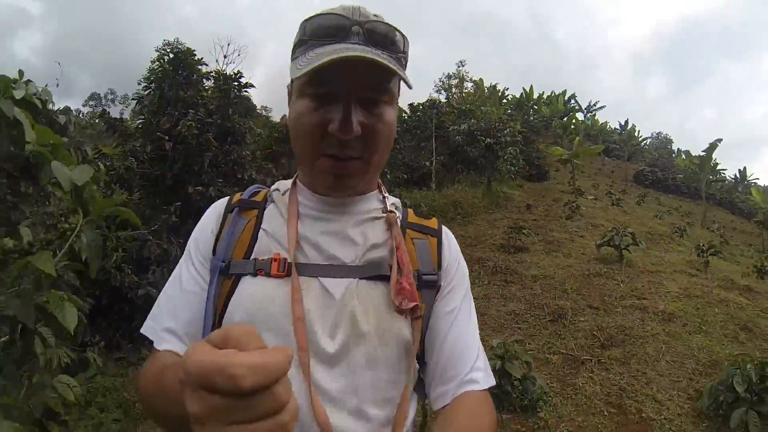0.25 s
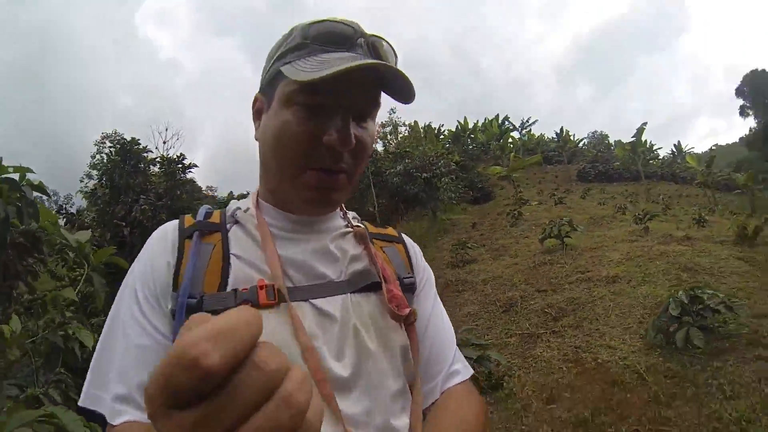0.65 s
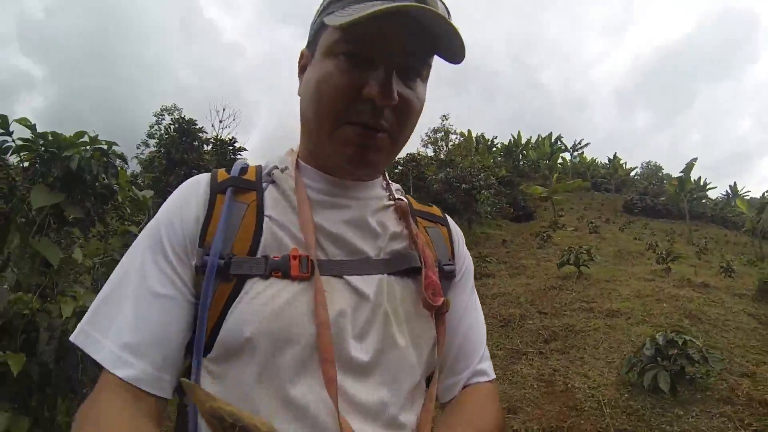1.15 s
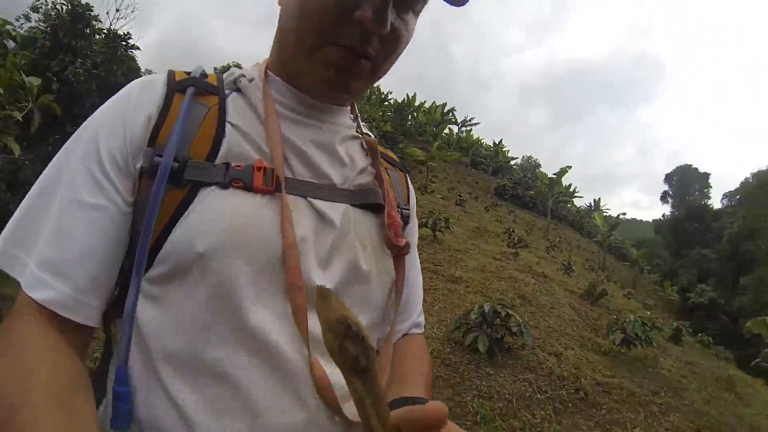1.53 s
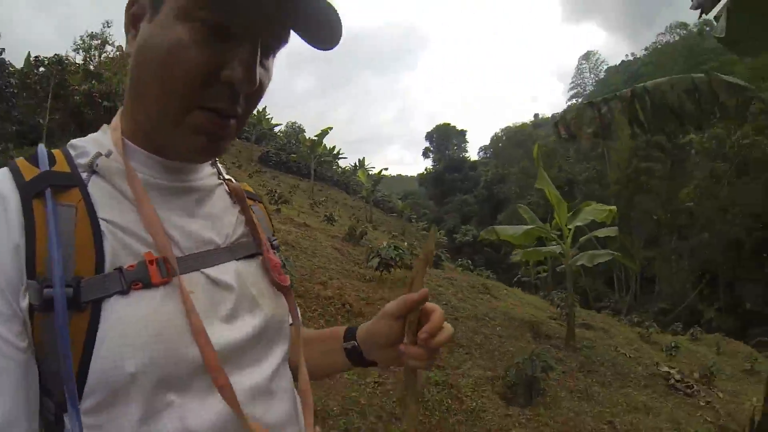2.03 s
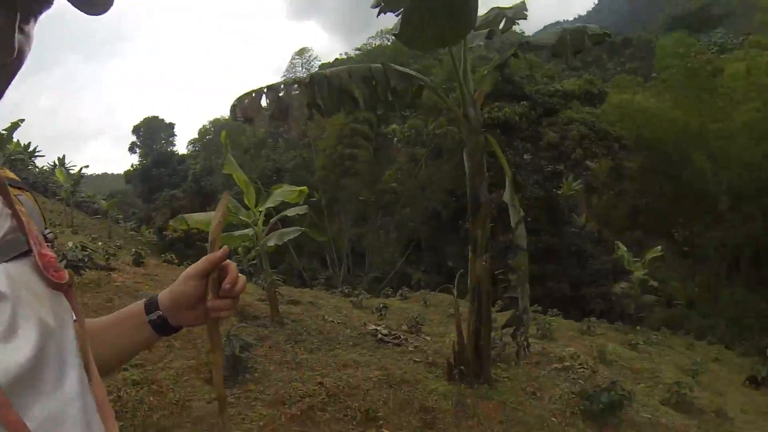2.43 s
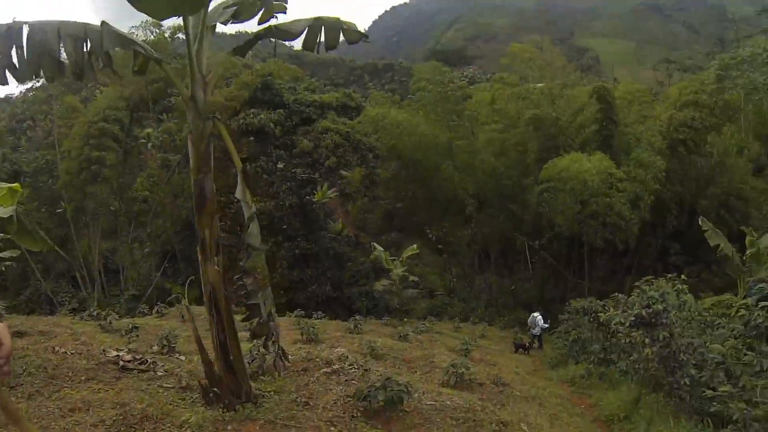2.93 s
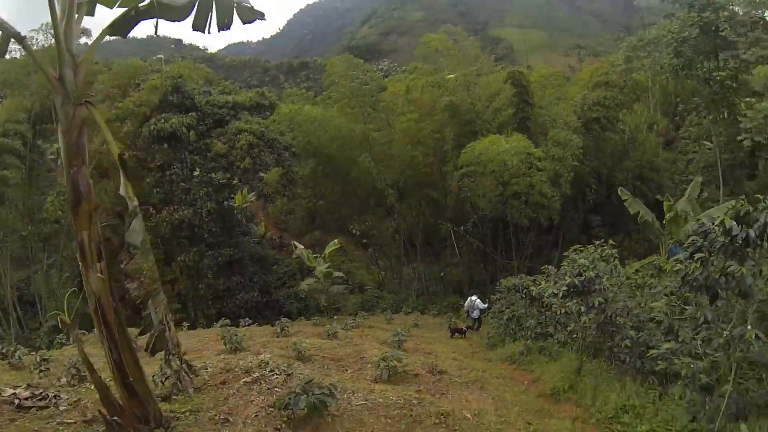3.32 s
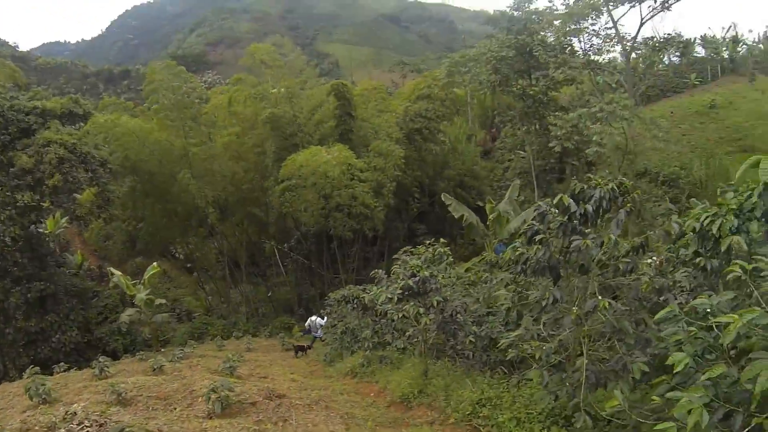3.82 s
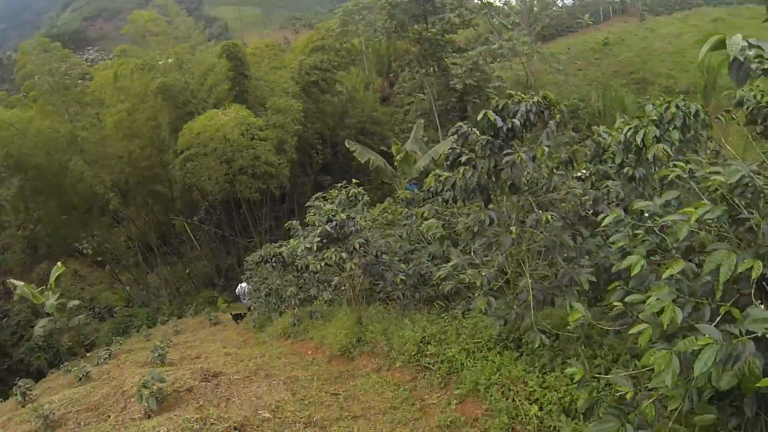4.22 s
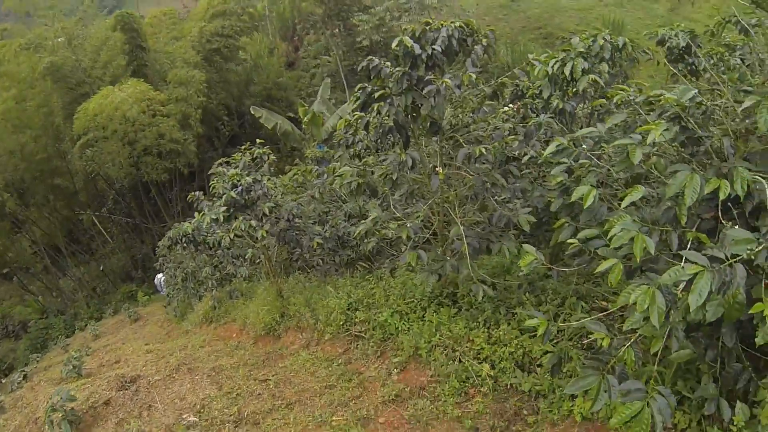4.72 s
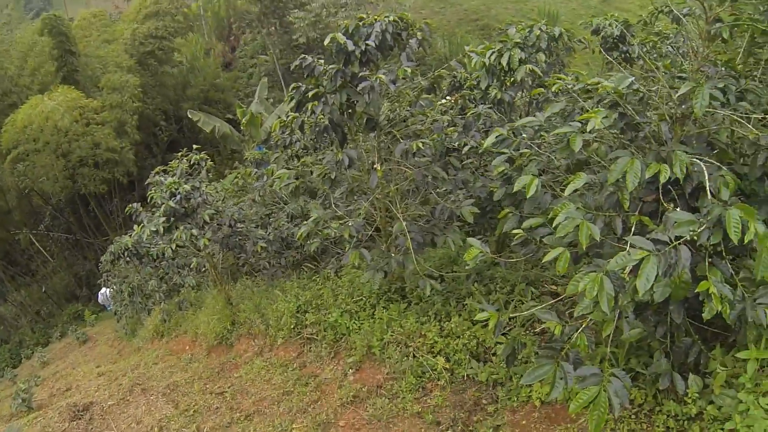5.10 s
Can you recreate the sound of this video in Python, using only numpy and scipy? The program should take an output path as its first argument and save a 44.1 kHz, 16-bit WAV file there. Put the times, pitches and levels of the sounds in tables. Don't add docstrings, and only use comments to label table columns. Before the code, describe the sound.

Close, boxy handling noise: fingers rub a hollow plastic case, sharp knocks and dull thumps cluster early, then fade to near silence outdoors.

```python
import sys
import numpy as np
from scipy import signal
from scipy.fft import rfft, irfft
from scipy.io import wavfile
from scipy.ndimage import uniform_filter1d

SR = 44100
rng = np.random.default_rng(int(sys.argv[2]) if len(sys.argv) > 2 else 0)


def output_pcm(signal):
    pcm = np.clip(np.atleast_2d(signal).T, -1, 1) * 32767
    wavfile.write(sys.argv[1], SR, np.round(pcm).astype(np.int16))


def gain_from_db(level_db):
    decades = np.asarray(level_db, float) / 20
    return 10 ** decades


N = 236155
T = np.arange(N) / SR

# start_s, length_s, force_db, speed_db
GRIP_SLIDES = [(0.045, 0.03, -58.5, -3), (0.526, 0.11, -60.5, -12), (0.648, 0.15, -55, 1),
               (0.767, 0.035, -51.5, 3), (0.848, 0.057, -44, 0.5), (1.088, 0.022, -48.5, 4),
               (1.127, 0.046, -46, 5), (1.366, 0.003, -30, 6.5), (1.353, 0.015, -31, 1),
               (2.075, 0.02, -59, 5), (2.103, 0.032, -49.5, 4), (2.196, 0.036, -52, -4),
               (2.362, 0.013, -49, 7), (2.457, 0.061, -51, -1), (2.496, 0.039, -39, -2),
               (2.569, 0.04, -41.5, -6), (2.594, 0.056, -36, -6), (2.715, 0.05, -40.5, -12),
               (2.702, 0.023, -48.5, -8), (2.815, 0.11, -51, -9), (3.255, 0.04, -51.5, 0),
               (3.487, 0.1, -53, -11), (3.569, 0.074, -49.5, -1.5), (3.825, 0.017, -61, 9),
               (3.91, 0.034, -34, 0.5), (4.33, 0.13, -64.5, 4), (4.535, 0.068, -66, 10)]
# start_s, length_s, force_db, speed_db
FRONT_SLIDES = [(0.504, 0.031, -56.5, -3), (0.9, 0.051, -61, 4), (0.955, 0.008, -55, 1),
                (1.182, 0.014, -50, 11.5), (1.232, 0.1, -57, -1), (1.373, 0.067, -41.5, 3.5),
                (1.3851, 0.018, -63, 2), (1.444, 0.062, -39, 8), (1.493, 0.034, -45, -6),
                (1.51, 0.12, -42.5, -5), (1.575, 0.061, -39.5, -5.5), (1.598, 0.083, -47.5, -3),
                (1.66, 0.083, -49.5, -1.5), (1.79, 0.023, -64.5, 7), (2.0301, 0.0071, -59, 9),
                (2.216, 0.051, -39, -2), (2.285, 0.075, -73, 13), (2.431, 0.031, -59.5, -2),
                (2.642, 0.03, -56.5, -14), (3.027, 0.26, -62, -18)]
# start_s, length_s, force_db, speed_db
MOUNT_SLIDES = [(0, 0.022, -56.5, 9.5), (0.1751, 0.018, -59.5, -27), (0.301, 0.07, -73.5, 17),
                (.951, 0.036, -69, -6), (1.184, 0.011, -56, -11), (1.3221, 0.035, -50, 11.5),
                (1.4341, 0.0223, -34.5, 1), (1.501, 0.31, -66.5, 2), (1.7411, 0.0069, -58, -1),
                (1.7661, 0.015, -68, 13), (2.0291, 0.082, -55, -8), (2.841, 0.049, -73, -8),
                (3.5, 0.048, -74, -3), (3.58, 0.065, -75, -10), (3.9421, 0.026, -63, -5)]
# start_s, length_s, force_db, speed_db
BACK_SLIDES = [
    (3.17, 0.051, -40.5, -3),
    (3.192, 0.051, -35, -1),
]
# window_db, mount_db, grit_db
AT_GRIP = (-9.5, -2.5, -18.5)
AT_FRONT = (0.33, -7, -15)
AT_MOUNT = (-1.3, 9.05, -19)
AT_BACK = (-10.5, -10, -20)
WINDOW_PER_SPEED, MOUNT_PER_SPEED, FINE_PER_SPEED = 0.59, -0.017, 0.54
FINE_DB = -4

# start_s, shell_level_db, window_db and mount_db against the shell, contact_s
KNOCKS = [(0.011, -37.5, -1, 4, 0.0014), (0.054, -47, -5, 1, 0.003), (0.503, -56, -6, 10.5, 0.0036),
          (1.084, -44.5, -8, -1, 0.004), (1.105, -36.5, -19, -10, 0.0063), (1.35, -18.5, -19, -4.5, 0.005),
          (1.3694, -22.5, -35, -3, 0.0015), (1.449, -39, 9, -8, 0.0048), (1.7361, -29.5, -17, -15, 0.0014),
          (1.998, -44.5, -10, 3.5, 0.0031), (2.019, -51, -6, 4.5, 0.0085), (2.061, -47, 5.5, 10, 0.0028),
          (2.367, -51, 6, -12, 0.0087), (2.967, -51, -8, 2.5, 0.011), (3.9104, -27, -13, 4.5, 0.004),
          (3.915, -29.5, -20, -14, 0.0024), (3.926, -36.5, -28, 5.5, 0.0023), (3.935, -45, -32, 3, 0.0048),
          (0.85, -49, -11, -10, 0.0031), (1.273, -52, -4, 3, 0.0027), (1.751, -58, -14, -1, 0.0035),
          (2.206, -52, 0, -17, 0.0027), (2.468, -50.5, -16, 3, 0.0035)]
KNOCK_DAMPING, KNOCK_GRIT_DB = 1.4, -29

# time_s, upper_shell_share (0-1), upper_mount_share (0-1)
TOUCH = [(.72, 0.37, 0.08), (.8, 0.6, 0.04), (.87, 0.58, 0.43), (.96, 0.4, 0.07), (1.1, 1, 0.08),
         (1.16, 0.3, 0.7), (1.35, 0.25, 0.77), (1.447, 0.4, 0.01), (1.55, 0.43, 0.47), (1.73, 0.3, 0.4),
         (2.0, 0, 0.15), (2.1, 0.63, 0.11), (2.24, 0.89, 0.68), (2.37, 0.98, 0.5), (2.5, 0.2, 0.52),
         (2.72, 0.12, 0.5), (3.2, 0.2, 0.44), (3.5, 0.1, 0.56), (3.62, 0.26, 0.7), (3.92, 0, 0.26),
         (4.35, 0.36, .3)]
# pitch_hz, width_hz, level_db
SHELL = [(1378, 390, -2), (1421, 151, 9.5), (1419, 320, 1.5)]
# pitch_hz, width_hz, level_db
SHELL_UP = [(1560, 77, -7), (1647, 72, -5), (1864, 100, -13.5)]
# pitch_hz, width_hz, level_db
WINDOW = [(2070, 690, -4), (2322, 110, 3.5), (2574, 78, -10.5), (2807, 62, -7)]
# pitch_hz, width_hz, level_db
MOUNT = [(290, 64, -3), (385.5, 24.8, 2), (436, 150, -10.5)]
# pitch_hz, width_hz, level_db
MOUNT_UP = [(611.6, 116, 2), (721, 59, -5), (846, 59, -4)]
# pitch_hz, width_hz, level_db
GRIT = [(3110, 59, 0), (3650, 310, 3.5), (4153, 86, 4.5), (4750, 930, -4), (5440, 720, -5.5),
        (5280, 180, -8), (5750, 290, 0), (6130, 590, -2), (6900, 400, -37)]

# start_s, peak_db,
# pitch_hz, t60_s
TAPS = [(1.138, -41.5, 1500, .02), (1.178, -38, 2320, .02), (1.176, -40, 1450, .02),
        (1.332, -39, 1800, 0.017), (1.402, -40, 1500, .025), (1.417, -31.5, 2310, 0.039),
        (1.417, -34, 1445, 0.024), (1.439, -29, 2340, .02), (1.449, -7.5, 2363, 0.023),
        (1.477, -31, 2220, .03), (1.7351, -2, 1460, 0.0077), (1.7347, -16.5, 2230, 0.015),
        (1.7348, -10.5, 623, 0.015), (1.736, -16.5, 299, 0.066), (1.736, -29, 408, .04),
        (1.748, -34, 1590, .015), (2.219, -31, 1525, 0.039), (2.232, -25.5, 1520, 0.042),
        (2.243, -29, 1608, 0.049), (2.252, -28, 1620, 0.046), (2.204, -43, 1410, 0.022),
        (2.373, -32, 1610, 0.025), (1.102, -37, 1630, 0.05), (2.512, -27.5, 1500, 0.021),
        (2.577, -49, 1440, 0.018), (2.593, -31, 1470, .025), (2.617, -23.5, 1480, 0.028),
        (2.701, -42, 1410, 0.034), (2.711, -37, 1420, 0.023), (2.721, -30.5, 1452, 0.063),
        (2.745, -31, 1494, 0.034), (2.852, -46, 1460, .02), (3.073, -45, 2380, 0.019),
        (3.179, -32, 1450, .02), (3.188, -29, 1490, 0.036), (3.204, -29, 1420, 0.027),
        (3.914, -18.5, 1440, 0.025), (3.925, -32, 1390, 0.028), (3.934, -30, 1480, .025),
        (3.912, -44, 800, 0.08), (3.942, -30, 1580, 0.031), (0.011, -31, 1920, 0.022),
        (0.183, -59, 1660, .015), (0.601, -47, 1900, .015),
        (1.3496, -10, 1500, 0.036), (1.365, -18, 1420, 0.031), (1.439, -27, 1430, .03),
         (1.369, -16, 620, .03), (1.404, -30, 500, .03), (1.447, -20, 1850, .025),
         (1.585, -25, 2270, 0.034), (1.592, -29, 1300, .03), (2.02, -36.5, 1580, 0.023),
         (2.035, -49, 2250, 0.018), (2.051, -49, 1450, 0.018), (2.088, -44, 1500, .02),
         (2.13, -42, 1650, .02), (2.66, -60, 1660, .06), (3.206, -34, 622, 0.06), (3.19, -31, 620, 0.05),
         (.851, -38, 1500, 0.035), (.891, -36, 1560, .03), (.962, -42, 2400, 0.026), (.6, -49, 1510, .03),
         (2.366, -37, 1650, 0.027), (2.218, -30.5, 2330, .03), (2.248, -36, 2400, .03),
         (1.773, -47, 2250, .02), (3.52, -48.5, 385, .15), (3.6, -46, 390, .15), (4.352, -52, 2500, .03),
         (4.352, -51, 1000, 0.034)]
TAP_RISE_S = 0.00073
# middle_s, peak_db, pitch_hz, half_length_s
TICKS = [(0.515, -43.5, 5500, 0.00029), (0.75, -57, 11600, 0.00049), (1.353, -44, 8000, 0.00012),
         (1.366, -62, 8300, 0.00011), (1.38, -50, 8400, 0.00011), (1.4505, -38.5, 10000, 0.000082),
         (1.738, -44, 7400, 0.00015), (2.035, -57, 5730, 0.0013), (3.148, -45.5, 5000, 0.00021),
         (3.935, -44.5, 11000, 0.000067), (4.5, -45, 5850, 0.00009)]
# peak_db, decay_s
OPENING = (-24, 0.00065)

# start_s, peak_db, pitch_hz, t60_s
BLOWS = [(0.01, -21.5, 99, 0.053), (0.562, -31.5, 105, 0.24), (0.697, -25, 100, 0.053),
         (0.961, -31.5, 86, 0.063), (1.085, -23.5, 79.6, 0.059), (1.103, -17, 83.4, 0.072),
         (1.144, -14, 89.7, 0.084), (1.193, -15, 94, 0.069), (1.324, -9.5, 97.3, 0.036),
         (1.353, -7.5, 97, 0.017), (1.37, -7, 107, 0.038), (1.444, -21, 100.3, 0.095),
         (1.7362, -14.5, 116.6, 0.042), (1.999, -28, 114.3, 0.21), (2.058, -28, 108, 0.062),
         (2.084, -29, 108, 0.07), (2.209, -32, 109, 0.11), (2.466, -28.5, 112.6, 0.13),
         (2.501, -44, 121, 0.076), (2.582, -26.5, 108, 0.17), (2.607, -36, 114, 0.064),
         (2.702, -30, 102.6, 0.07), (2.731, -35, 108, 0.052), (2.917, -23.5, 101, 0.063),
         (3.19, -30.5, 119, 0.044), (3.217, -33.5, 118, 0.07), (3.602, -32, 118.4, 0.24),
         (3.92, -21, 114.6, 0.13)]
# start_s, peak_db, pitch_hz, t60_s
RECOILS = [
    (3.9148, -9, 95, 0.017),
]
# start_s, peak_db, pitch_hz
NUDGES = [(0.187, -29.5, 108), (0.293, -39, 105), (0.503, -34.5, 110), (0.635, -31.5, 102),
          (1.519, -45, 129), (1.606, -34, 127), (1.818, -42.5, 118), (2.127, -36, 96.9), (2.852, -54, 116),
          (3.279, -49, 113), (3.504, -38.5, 121), (3.585, -37.5, 96.9), (3.793, -43.5, 99.6),
          (4.036, -46, 113), (4.09, -51, 116), (4.271, -51, 96.9), (4.366, -42.5, 105), (4.415, -38.5, 105),
          (4.519, -52.5, 127), (4.609, -48, 124), (4.784, -46.5, 127), (4.909, -52, 129)]
NUDGE_T60_S = 0.087
# pitch_hz, width_hz, level_db
POLE = [(108, 32.7, -2), (124, 77, -13), (163, 21, -34)]
# time_s, arm_sway_db, pole_shake_db
GRIP = [(0.0, -40.5, -44), (0.39, -39, -44), (1.13, -42, -57.5), (1.309, -38.5, -33.5), (1.41, -36.5, -32),
        (1.71, -40.5, -53), (2.23, -40.5, -48.5), (2.52, -34.5, -45.5), (2.68, -43.5, -48),
        (2.95, -40.5, -52), (3.16, -47, -46), (3.56, -44.5, -52), (3.71, -44, -56), (3.84, -39.5, -47),
        (4.23, -42.5, -67), (4.63, -41, -55), (5.13, -52, -59.5), (5.35, -48.5, -63)]
SWAY_DB, SHAKE_DB, SHAKE_BY_SLIDE_DB = 8, -2.5, 7
# pitch_hz, level_db (per Hz)
SWAY = [(5.9, -6), (10, -2.5), (23, -12), (30, -18.5), (43, -19), (70, -24), (90, -42), (120, -31),
        (200, -120)]
# start_s, peak_db, pitch_hz, length_cycles
LURCHES = [(0, -41, 35, 0.31), (0.147, -22, 55, 1.8), (0.239, -17.5, 27, 3.3), (0.548, -8.5, 33.3, 1.26),
           (0.713, -15.5, 34, 1.07), (0.796, -16.5, 23.7, 1.3), (1.117, -9, 16.7, 0.46),
           (1.211, -17, 20.6, 0.65), (1.336, -15, 60, 4.5), (1.432, -7, 28, 1.07), (1.715, -16, 42, 1.2),
           (1.938, -16.5, 18, 0.91), (2.547, -20.5, 20, 2.5), (2.894, -27, 28, 0.72),
           (3.217, -15.5, 14.2, 0.59), (3.883, -12, 19, 0.91), (4.427, -16.5, 18.7, 0.15)]

# first_s, period_s, length_s, pitch_hz, level_db
CHIRP = (.085, .2525, .025, 5300, -73)
# start_s, length_s, top_hz, arch_hz, level_db
BIRDS = [
    (2.605, .15, 6560, 553, -73),
    (3.41, 0.029, 8450, 100, -82.5),
    (3.418, 0.034, 7300, 100, -71),
    (3.472, 0.055, 7750, 100, -70),
    (3.475, .04, 8450, 100, -74),
    (3.463, .02, 9200, 200, -72),
    (4.956, .051, 8200, 200.7, -69),
]
FLUTTER_HZ_S = 11
# pitch_hz, width_hz, level_db
INSECT = (5060, 63, -80.5)
PIPS = [.35, .47, .52, .92, .97, 1.9, 2.05, 2.36, 2.55, 2.65, 2.76, 2.9, 2.95, 3.125, 3.165, 3.5, 4.5, 4.95,
        5.0, 5.06, 5.2, 5.29, 5.33]
# length_s, pitch_hz, level_db
PIP = (.03, 11300, -82)
# pitch_hz, width_hz, level_db
DRONES = [
    (7600, 1100, -86),
    (10050, 200, -91),
    (12700, 80, -95),
]
# pitch_hz, level_db (per Hz)
HUSH = [(170, -14), (260, -18), (430, -20), (800, -24), (1150, -26.5), (1500, -17), (1750, -24.5),
        (2000, -25.5), (2700, -26), (3500, -30), (4500, -31), (7000, -37), (10000, -42.5), (15400, -43.5)]
HUSH_DB = -61
# pitch_hz, level_db
WHINE = [(6595, -92), (10427, -98), (12645, -99)]

TOP_HZ = 12800
# from_s, to_s
DULL_SPELLS = [(.13, .36), (.5, .6), (.72, .76), (.82, .86), (1.05, 1.11), (1.25, 1.29), (1.85, 2.01),
               (2.15, 2.23), (2.34, 2.37), (2.45, 2.5), (2.55, 2.59), (2.69, 2.73), (2.81, 2.84),
               (2.91, 3.04), (3.17, 3.2), (3.28, 3.49), (3.84, 3.86), (3.72, 3.75), (3.97, 4.09),
               (4.38, 4.52), (4.68, 4.71), (4.85, 4.92)]
# pitch_hz, share (0-1)
HOLE_SHARE = [(12800, .08), (14000, .35), (15000, .55), (15500, .95)]
# pitch_hz, share (0-1)
DULL_SHARE = [(12800, .8), (13600, .95), (15500, .99)]


def evened(x):
    return x / np.sqrt(np.mean(x ** 2) + 1e-20)


def add(mix, s, sound):
    part = mix[max(round(s * SR), 0):][:len(sound)]
    part += sound[:len(part)]


def tone(hz, t):
    return np.sin(2 * np.pi * hz * t)


def coloured(points):
    hz = np.fft.rfftfreq(N, 1 / SR)
    f, db = np.transpose(points)
    gain = gain_from_db(np.interp(np.log(hz + 1), np.log(f), db, -120, -120))
    return evened(irfft(rfft(rng.standard_normal(N)) * gain, N))


def wander(per_s):
    size = max(int(SR / per_s), 1)
    smooth = uniform_filter1d(rng.standard_normal(N), size)
    return evened(uniform_filter1d(smooth, size))


def ring(modes, rise_s, damping=0.79, sign=-1):
    t = T[:8192]
    h = np.zeros(len(t))
    for k, (hz, width, db) in enumerate(modes):
        decay = np.exp(-np.pi * width * damping * t)
        h += sign ** k * gain_from_db(db) * width * decay * tone(hz, t)
    h *= (1 - np.exp(-t / rise_s)) ** 2
    return h / np.linalg.norm(h)


def rung(force, *args):
    return signal.oaconvolve(force, ring(*args))[:N]


def strokes():
    force = np.zeros((5, N))
    places = [(GRIP_SLIDES, AT_GRIP), (FRONT_SLIDES, AT_FRONT), (MOUNT_SLIDES, AT_MOUNT), (BACK_SLIDES, AT_BACK)]
    for rows, (window_db, mount_db, grit_db) in places:
        for s, length, db, speed_db in rows:
            stroke = signal.windows.tukey(int((length + 0.013) * SR), .75)
            parts = [0,
                     window_db + WINDOW_PER_SPEED * speed_db,
                     mount_db + MOUNT_PER_SPEED * speed_db,
                     grit_db + speed_db,
                     grit_db + FINE_DB + (1 + FINE_PER_SPEED) * speed_db]
            for k, rel_db in enumerate(parts):
                fast = np.hanning(len(stroke)) ** 0.037 if k > 2 else 1
                add(force[k], s - .006, gain_from_db(db + rel_db) * stroke * fast)
    return force


def slides():
    clumps = np.where(np.arange(5)[:, None] < 3, 1, gain_from_db(2.3 * wander(44)))
    slipping = rng.random(N) < 2500 / SR
    slips = slipping * gain_from_db(3.07 * rng.exponential(1, N)) * rng.standard_normal(N)
    friction = evened(slips) + 0.49 * rng.standard_normal(N)
    return strokes() * clumps * evened(friction * gain_from_db(1.15 * wander(82)))


def knocks():
    force, t = np.zeros((5, N)), T[:1500]
    chatter = rng.standard_normal((len(KNOCKS), len(t)))
    for (s, db, window_db, mount_db, contact_s), noise in zip(KNOCKS, chatter):
        rattle = np.exp(-t / max(contact_s, .0003)) * noise
        rattle /= np.linalg.norm(rattle)
        struck = rattle + np.pad(0.29 * np.hanning(10), (0, len(t) - 10))
        struck = np.convolve(struck, np.hanning(15), "same")
        struck /= np.linalg.norm(struck)
        parts = [(0, struck), (window_db, struck), (mount_db, struck),
                 (KNOCK_GRIT_DB, rattle), (KNOCK_GRIT_DB, rattle)]
        for k, (rel_db, burst) in enumerate(parts):
            add(force[k], s + 0.00052, gain_from_db(db + rel_db + 15.5) * burst)
    return force


def housing(force, damping, rise_s, sign):
    s, *shares = np.transpose(TOUCH)
    shell_up, mount_up = (np.clip(np.interp(T, s, share), 0, 1) for share in shares)
    shell, window, mount, grit, fine = force
    driven = [(SHELL, shell * np.sqrt(1 - shell_up)),
              (SHELL_UP, shell * np.sqrt(shell_up)),
              (WINDOW, window),
              (MOUNT, mount * np.sqrt(1 - mount_up)),
              (MOUNT_UP, mount * np.sqrt(mount_up))]
    out = gain_from_db(-1) * rung(grit, GRIT[:4], .0001) + gain_from_db(-7) * rung(fine, GRIT[4:], .0001)
    for modes, push in driven:
        out += rung(push, modes, rise_s, damping, sign)
    return out


def taps():
    out, t = np.zeros(N), T[:6000]
    rise = 1 - np.exp(-t / TAP_RISE_S)
    for s, db, hz, t60 in TAPS:
        add(out, s, gain_from_db(db - 60 * t / max(t60, .005)) * rise * tone(hz, t))
    return out


def ticks():
    peak_db, decay_s = OPENING
    out = gain_from_db(peak_db) * np.exp(-T / decay_s)
    t = np.arange(-80, 80) / SR
    for s, db, hz, half_s in TICKS:
        add(out, s - .0018, gain_from_db(db) * np.exp(-(t / half_s) ** 2) * tone(hz, t))
    return out


def pole():
    out, t = np.zeros(N), T[:9000]
    blows = [(1, row) for row in BLOWS] + [(-1, row) for row in RECOILS]
    blows += [(1, (*row, NUDGE_T60_S)) for row in NUDGES]
    for side, (s, db, hz, t60) in blows:
        shape = (1 - np.exp(-t / 0.0058)) ** 2 * gain_from_db(-60 * t / max(t60, .02))
        add(out, s - .003, side * gain_from_db(db + 2.5) * shape / shape.max() * tone(hz, t))
    s, _, db = np.transpose(GRIP)
    effort = gain_from_db(np.interp(T, s, db) + SHAKE_DB)
    effort += gain_from_db(SHAKE_BY_SLIDE_DB) * np.minimum(strokes()[2], .004)
    shake = rng.standard_normal(N) * effort * gain_from_db(2.7 * wander(34))
    return out + rung(shake, POLE, 0.0013)


def arm():
    s, db, _ = np.transpose(GRIP)
    out = coloured(SWAY) * gain_from_db(np.interp(T, s, db) + SWAY_DB + 2.0 * wander(44))
    for s, db, hz, cycles in LURCHES:
        t = np.arange(0, (cycles + 1) / hz, 1 / SR)
        add(out, s - .005, gain_from_db(db - 2.5) * np.hanning(len(t)) * tone(hz, t))
    return out


def cricket():
    first, period, length, hz, db = CHIRP
    out, t = np.zeros(N), np.arange(0, length, 1 / SR)
    for k, chance in enumerate(rng.standard_normal(21)):
        add(out, first + k * period, gain_from_db(db + 2.5 * chance) * np.hanning(len(t)) * tone(hz, t))
    return out


def birds():
    out = np.zeros(N)
    for s, length, hz, arch_hz, db in BIRDS:
        u = np.arange(0, 1, 1 / (length * SR))
        flutter = FLUTTER_HZ_S / length * wander(400)[:len(u)]
        turns = np.cumsum(hz - arch_hz * (2 * u - 1) ** 2 + flutter) / SR
        add(out, s, gain_from_db(db) * np.hanning(len(u)) * tone(1, turns))
    return out


def far_insect():
    hz, width, db = INSECT
    return gain_from_db(db + 1.5 * wander(30)) * rung(rng.standard_normal(N), [(hz, width, 0)], 0.0013)


def high_insects():
    length, hz, db = PIP
    out, t = np.zeros(N), np.arange(0, length, 1 / SR)
    for s, chance in zip(PIPS, rng.standard_normal(len(PIPS))):
        add(out, s - length / 2, gain_from_db(db + 2 * chance) * np.hanning(len(t)) * tone(hz, t))
    for hz, width, db in DRONES:
        out += gain_from_db(db + 2 * wander(10)) * rung(rng.standard_normal(N), [(hz, width, 0)], .001)
    return out


def hush():
    return gain_from_db(HUSH_DB + .7 * wander(8)) * coloured(HUSH)


def electronics():
    return sum(gain_from_db(db - 7) * tone(hz, T) for hz, db in WHINE)


def scene():
    handling = housing(slides(), damping=0.97, rise_s=0.00038, sign=-0.96)
    handling += housing(knocks(), damping=KNOCK_DAMPING, rise_s=0.00013, sign=0.93)
    handling += taps() + ticks() + pole() + arm()
    outdoors = cricket() + birds() + far_insect() + high_insects() + hush()
    return (handling + outdoors + electronics())[None]


def patchy_treble(x):
    hz, t, z = signal.stft(x, SR, nperseg=1024, noverlap=512)
    dull = sum(1. * (t > a) * (t < b) for a, b in DULL_SPELLS)
    usual_share = np.interp(hz, *np.transpose(HOLE_SHARE))[:, None]
    dull_share = np.interp(hz, *np.transpose(DULL_SHARE))[:, None]
    share = np.where(dull, dull_share, usual_share)
    draw = rng.random((len(t) // 2 + 1, 103)).T.repeat(5, 0).repeat(2, 1)[:len(hz), :len(t)]
    top = abs(z[0][hz > TOP_HZ]).mean(0)
    no_click = top < 2 * np.median(top)
    empty = (hz > TOP_HZ)[:, None] * (draw < share) * no_click
    return signal.istft(z * (1 - empty), SR, nperseg=1024, noverlap=512)[1][:, :N]


def top_cut(x):
    return signal.sosfilt(signal.butter(12, 15600, fs=SR, output="sos"), x)


def record(dry):
    mix = 1.5 * np.tanh(patchy_treble(dry) / 1.5)
    return top_cut(mix)


dry = scene()
out = record(dry)
output_pcm(out)
```